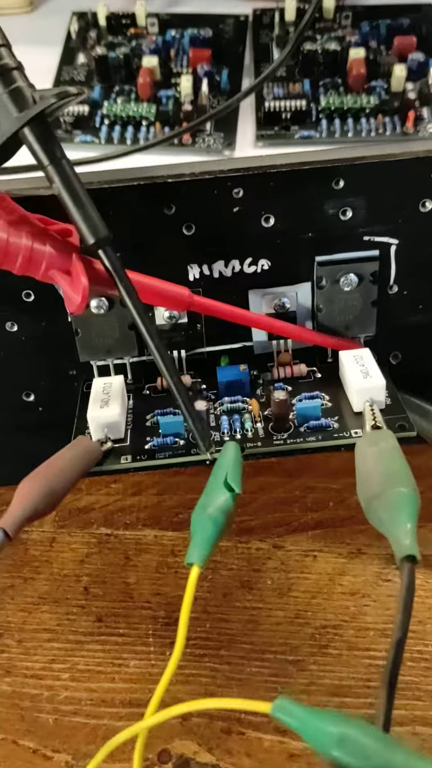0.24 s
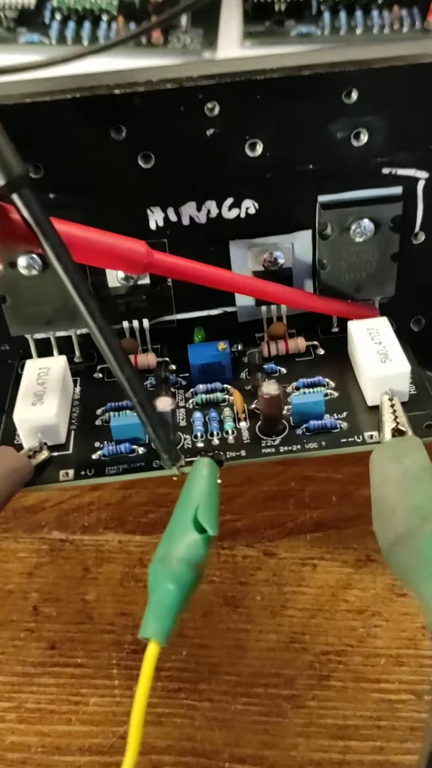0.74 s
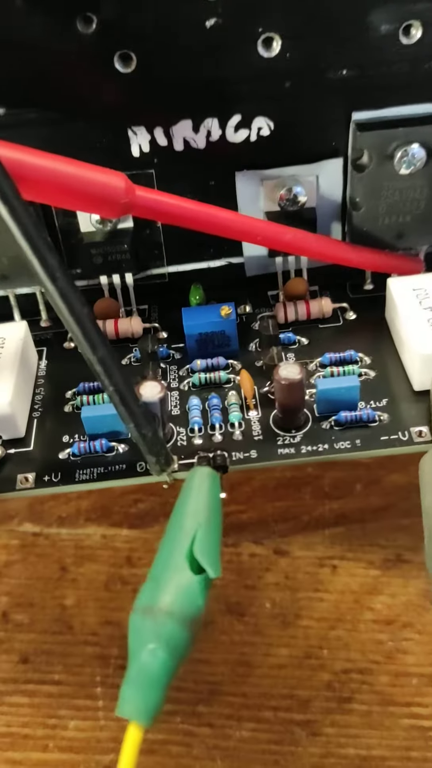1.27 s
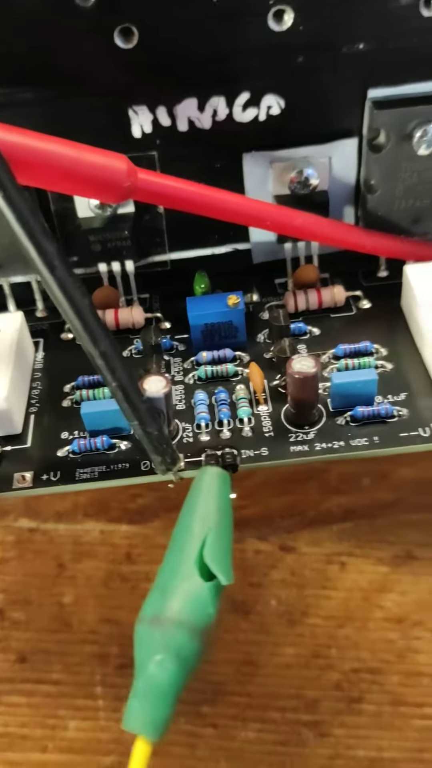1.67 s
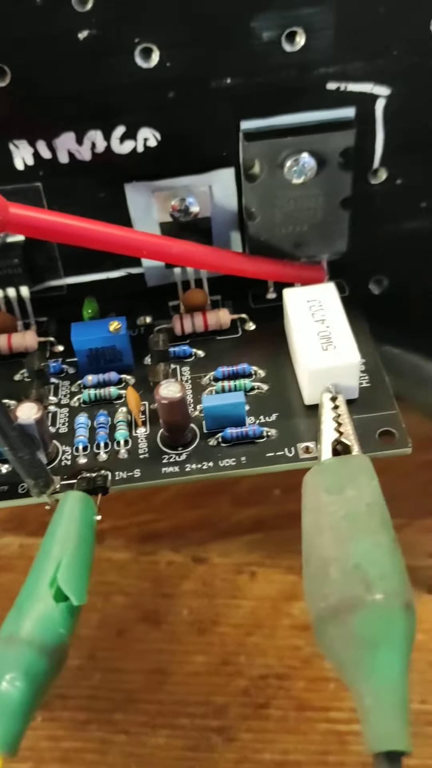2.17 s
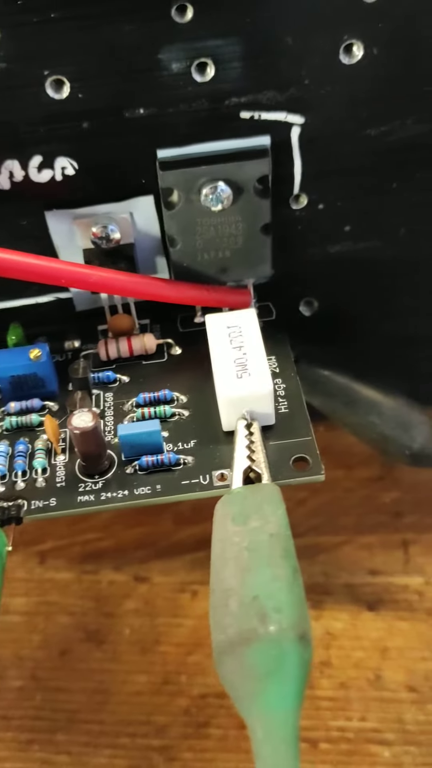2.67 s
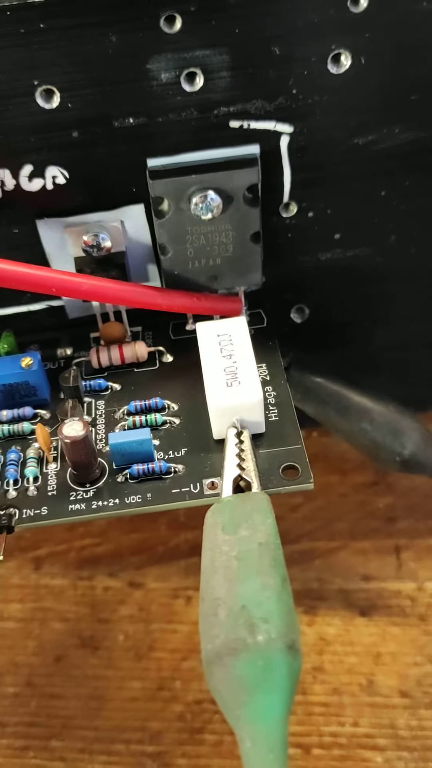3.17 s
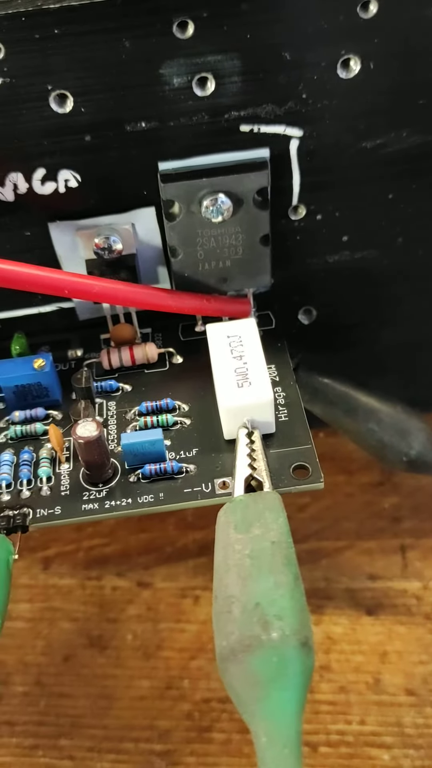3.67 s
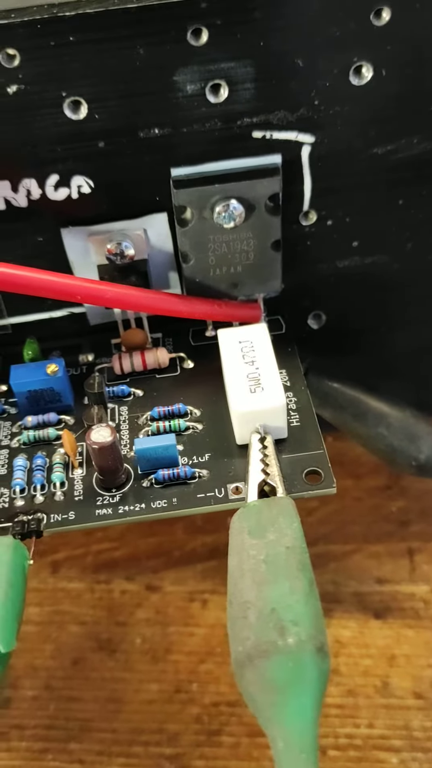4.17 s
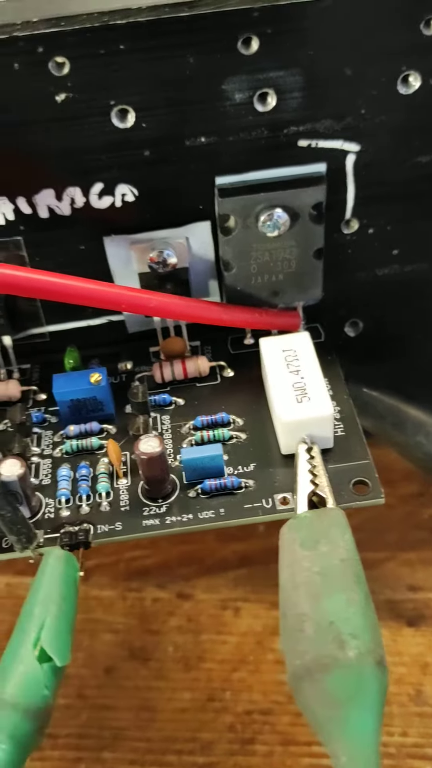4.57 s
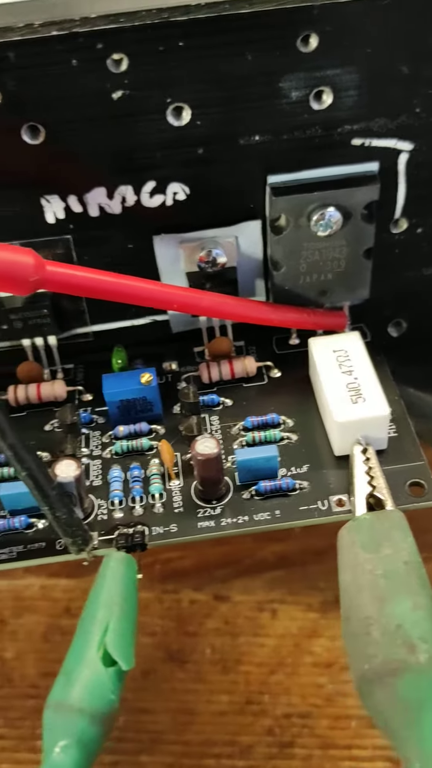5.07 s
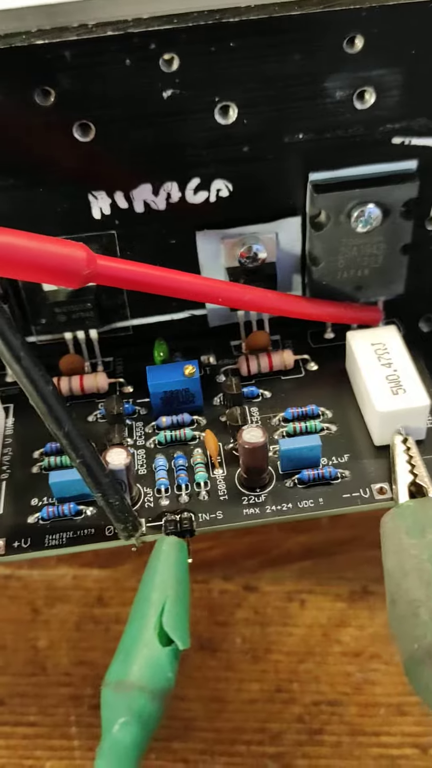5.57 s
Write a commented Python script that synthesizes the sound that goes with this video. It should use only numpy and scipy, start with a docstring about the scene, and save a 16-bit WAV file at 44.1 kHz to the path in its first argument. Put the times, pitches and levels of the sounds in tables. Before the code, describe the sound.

Beside an amplifier circuit board on a wooden bench, unseen equipment hums steadily. A low fan tone near 230 hertz wavers gently over soft rushing air, with faint transformer buzz and deep room rumble. A quick fade-in opens it, with high hiss strongest in the first half second, then settling. A phone's stereo microphones hear it slightly stronger on the left; a tiny skip occurs near 5.3 seconds.

```python
"""Powered equipment hums on a workbench, heard through a phone's two microphones. They wake up with a fade-in,
a fading offset and a hiss that settles. Throughout, a five-blade cooling fan sings its blade tone (wavering
sines) over rushing air (shaped noise), a mains transformer buzzes (sines), a second, slower fan adds unsteady
tones (narrow noise bands) and the room rumbles (noise). Near the end the phone drops one block of samples."""
import sys
import numpy as np
from scipy import signal
from scipy.fft import rfft, irfft, next_fast_len
from scipy.io import wavfile
from scipy.ndimage import uniform_filter1d, map_coordinates

SR = 44100
rng = np.random.default_rng(int(sys.argv[2]) if len(sys.argv) > 2 else 0)


def invert_db(level):
    """Linear amplitude ratio for a level in decibels (20 dB per decade), elementwise."""
    return 10 ** (np.asarray(level, dtype=float) / 20)


def digitize_waveform(pressure):
    """Quantize a signal to 16-bit integers and store it at the path in sys.argv[1].

    Rows of a 2-D input are taken as channels; values are limited to [-1, 1].
    """
    field = np.atleast_2d(pressure).T
    bounded = np.clip(field, -1, 1)
    quanta = np.round(bounded * 32767).astype(np.int16)
    wavfile.write(sys.argv[1], SR, quanta)


N = 256706  # samples heard
DROP_S, DROP_SAMPLES = 5.291, 1024  # where the lost block starts, and its length
LONG = N + DROP_SAMPLES  # samples made, before the block is lost
SHAFT_HZ, MAINS_HZ = 46.15, 49.99

# Fan tones as multiples of shaft speed; the third is the blade tone.
FAN_ORDERS = [1, 4, 5, 7.5, 10, 11, 15, 20, 25]
# Fan tones before swell and waver. Each row, one per order: left level in dB, right level in dB,
# radians by which left leads.
FAN_TONES = [(-75.5, -80, 1), (-74, -82, -1.5), (-51.5, -60, -0.54), (-74.5, -84.5, -1.5),
             (-66, -69, -0.46), (-81.5, -84, -3.5), (-91, -86.5, 1.5), (-74, -82.5, -2.5), (-75.5, -101, 0)]
# Slow swell of the blade tone. Each row: time in seconds, added level in dB.
BLADE_SWELL = [(.28, 2.5), (.6, -3.5), (.95, 0.5), (2.15, 4), (2.6, 1.5), (2.95, 5.5), (3.45, 1.5),
               (3.7, 4.5), (4, 1), (4.4, 3.5)]
# Rushing air before the room peaks. Each row: frequency in Hz, left level in dB per Hz, right level in dB per Hz.
AIR_SPECTRUM = [(93, -105.5, -101.9), (132, -93, -96.5), (202, -92, -98), (240.5, -80.5, -83),
                (329, -83, -95.5), (356, -90.5, -93), (448, -88, -93), (720, -94.5, -100.5),
                (784, -92.5, -99.5), (1026, -96, -101.7), (1570, -97.5, -105.8), (2230, -106.0, -108.4),
                (3600, -111.4, -114.7), (5330, -117.3, -117.4), (9100, -130, -130)]
# Stereo image of the air. Each row: frequency in Hz, left-right likeness (1 is identical, -1 opposite),
# radians by which left leads.
AIR_LIKENESS = [(59, 0.95, 0.5), (105, 0.67, 0), (166, 0.33, -0.05), (247, .9, -1), (334, 0.15, 0.8),
                (428, 1, 0), (538, 0.44, -.5), (840, 0.44, 0), (1040, 0.12, 1.5), (1200, 1, 1),
                (1550, 0.078, 2.5), (3020, 0.057, 3), (5900, 0.077, 2.5)]
# Standing waves that colour the air noise. Each row: centre in Hz, width in Hz, lift in dB (negative dips).
ROOM_PEAKS = [(172, 29, 7.5), (590, 39, 3), (771, 19, 7), (902, 69, 5), (990, 24, 2.5), (1051, 26, 6.5),
              (1200, 15, -5.5), (1360, 20, 4), (1467, 19, 7), (2870, 11, 10.5)]
# Transformer tones as multiples of mains frequency.
MAINS_ORDERS = [2, 6, 8, 10, 12, 14, 16]
# Transformer tones before waver. Each row, one per order: left level in dB, right level in dB,
# radians by which left leads.
TRANSFORMER_TONES = [(-75, -78.5, 0.16), (-64, -71, 1.16), (-80, -89.5, 2), (-71.5, -89, -1.47),
                     (-69.5, -71.5, -0.1), (-72, -76, -2.0), (-80.5, -81.5, 1)]
# Unsteady tones of the slower fan. Each row: frequency in Hz, random knots per second (sets the width),
# left gain in dB, right gain in dB.
SLOW_FAN_TONES = [(23.9, 2, -75, -78.5), (38.3, 6, -65.5, -70.5), (336, 2, -81.5, -87)]
# Room rumble. Each row: frequency in Hz, left level in dB per Hz, right level in dB per Hz.
RUMBLE_SPECTRUM = [(5, -89, -87.5), (16.5, -82.5, -88.5), (30.7, -95.5, -98.5), (40.3, -82, -86),
                   (52, -86, -89.5), (86.5, -99, -103), (144, -120, -120)]
# Microphone hiss before its settling gain. Each row: frequency in Hz, left level in dB per Hz,
# right level in dB per Hz.
HISS_SPECTRUM = [(940, -118, -118), (2540, -104.7, -104.7), (4000, -106.8, -106.5), (5430, -105.5, -106.2),
                 (6040, -103.7, -99.3), (7300, -102.2, -91.5), (7260, -93.5, -100.5), (8620, -93, -99.6),
                 (8990, -98, -105.8), (9360, -101.7, -109.5), (9900, -111.8, -112.5),
                 (11500, -111.2, -115.4), (13000, -115.3, -116.3), (15900, -114, -116)]
# Offset left by switching on, before the fade-in. Each row, left then right: size in dB, fall time in seconds.
SWITCH_ON_OFFSET = [(-35, 0.31), (-32, 0.23)]


def curve(rows, size):
    """(s, value) rows joined by straight lines."""
    return np.interp(np.arange(size) / SR, *np.transpose(rows))


def wobble(rate, channels=1):
    """Smooth random curves: splines through random knots, rate knots a second."""
    knots = rng.standard_normal((channels, int(LONG * rate / SR) + 4))
    position = np.arange(LONG) * rate / SR
    return np.array([map_coordinates(k, [position]) for k in knots])


def rush(spectrum, alike, patchy_db, peaks=()):
    """Stereo noise with a spectrum for each side, narrow peaks and patches of random gain."""
    cells = signal.stft(rng.standard_normal((2, LONG)), nperseg=512)[2]
    # both channels share one patch pattern, smoothed over frequency and then time
    patches = uniform_filter1d(rng.standard_normal(cells.shape[1:]), size=5, axis=0)
    patches = uniform_filter1d(patches, size=12, axis=1)
    patch_gain = invert_db(patchy_db * patches / patches.std())
    pair = signal.istft(cells * patch_gain, nperseg=512)[1][:, :LONG]

    size = next_fast_len(LONG)
    hz = np.fft.rfftfreq(size, 1 / SR)

    def along(points, values):
        return np.interp(np.log(hz + 1), np.log(points + 1), values)

    points, *sides = np.transpose(spectrum)
    lift_db = sum(db / (1 + (2 * (hz - centre) / width) ** 2) for centre, width, db in peaks)
    inside = (hz > points[0]) & (hz < points[-1])
    # sqrt(SR / 2) turns a level per Hz into a gain on white noise
    gain = [invert_db(along(points, db) + lift_db) * inside * np.sqrt(SR / 2) for db in sides]

    # sum and difference of two independent noises, weighted to give the wanted likeness
    points, likeness, lead = np.transpose(alike)
    angle = np.arccos(np.clip(along(points, likeness), -1, 1)) / 2
    common, opposed = rfft(pair, size) * [np.cos(angle), np.sin(angle)]
    left = (common + opposed) * np.exp(1j * along(points, lead))
    right = common - opposed
    return irfft(np.array([left, right]) * gain, size)[:, :LONG]


def tones(orders, table, base_hz, drift, waver_db, rate):
    """Multiples of one rotation; each wavers in level as the phone moves through the room's standing waves."""
    # drift scales a random wander of the rotation, in radians
    rotation = 2 * np.pi * base_hz * np.arange(LONG) / SR + drift * wobble(1.5)[0]
    out = np.zeros((2, LONG))
    for order, (left_db, right_db, lead) in zip(orders, table):
        level = invert_db([[left_db], [right_db]] + waver_db * wobble(rate))
        phase = order * rotation + rng.uniform(0, 2 * np.pi) + [[lead], [0]]
        out += np.sqrt(2) * level * np.sin(phase)  # levels are rms
    return out


def blade_tones():
    """Blades passing at five times shaft speed sing a firm tone, with weaker, less steady companions."""
    swell_db = curve(BLADE_SWELL, LONG) + 0.62 * wobble(3.194)
    blade = tones(FAN_ORDERS[2:3], FAN_TONES[2:3], SHAFT_HZ, drift=0.049, waver_db=0.69, rate=12.0)
    other_orders = FAN_ORDERS[:2] + FAN_ORDERS[3:]
    other_rows = FAN_TONES[:2] + FAN_TONES[3:]
    others = tones(other_orders, other_rows, SHAFT_HZ, drift=0.022, waver_db=2.0, rate=7)
    return invert_db(swell_db) * blade + others


def rushing_air():
    """Turbulent air as broadband noise, coloured by the room's standing waves and fluttering a little."""
    flutter = invert_db(0.6 * wobble(14))
    return flutter * rush(AIR_SPECTRUM, AIR_LIKENESS, patchy_db=0.6, peaks=ROOM_PEAKS)


def transformer():
    """A mains buzz: even multiples of the mains frequency, drifting together."""
    return tones(MAINS_ORDERS, TRANSFORMER_TONES, MAINS_HZ, drift=.04, waver_db=2.5, rate=2.92)


def slow_fan():
    """Narrow bands of noise: tones that lose their phase within a second."""
    t = np.arange(LONG) / SR
    out = np.zeros((2, LONG))
    for hz, knot_rate, left_db, right_db in SLOW_FAN_TONES:
        a, b = wobble(knot_rate, channels=2)
        tone = a * np.cos(2 * np.pi * hz * t) + b * np.sin(2 * np.pi * hz * t)
        out += invert_db([[left_db], [right_db]]) * tone
    return out


def room_rumble():
    """Low noise of the room, nearly alike in both ears of the phone."""
    return rush(RUMBLE_SPECTRUM, [(30, 0.94, 0.0017)], patchy_db=-0.5)


def microphone_hiss(t):
    """Noise that starts loud, drops around a knee, then creeps down to rest, nearly unrelated left to right."""
    rest_db, drop_db, knee_s, knee_sharpness = -18, 13, 0.47, 5.9
    creep_db, creep_s = 7.5, 1.14
    drop = drop_db / (1 + (t / knee_s) ** knee_sharpness)
    creep = creep_db * np.exp(-t / creep_s)
    return invert_db(rest_db + drop + creep) * rush(HISS_SPECTRUM, [(1000, 0.0067, 0.019)], patchy_db=1.4)


def switch_on_offset(t, opening):
    """A constant shift left by switching on, which rises with the opening input and decays exponentially."""
    return [invert_db(db) * opening * np.exp(-t / fall_s) for db, fall_s in SWITCH_ON_OFFSET]


def lose_block(x, t):
    """Skips one block of samples, with a very short crossfade across the join."""
    blend = np.clip((t[:N] - DROP_S) / .0008, 0, 1)  # 0.8 ms
    return x[:, :N] * (1 - blend) + x[:, DROP_SAMPLES:] * blend


def scene():
    """Everything on the bench and the room around it."""
    return blade_tones() + rushing_air() + transformer() + slow_fan() + room_rumble()


def band_limit(x):
    """A steep low-pass at the top of the band."""
    return signal.sosfilt(signal.butter(12, 15500, fs=SR, output="sos"), x)


def record(dry):
    """The phone adds hiss and offset, fades in along a straight ramp and loses one block."""
    fade_s, fade_from_db = 0.21, -11.5
    t = np.arange(LONG) / SR
    opening = np.minimum(t / fade_s, 1)
    fade_in = opening + invert_db(fade_from_db) * (1 - opening)
    mix = fade_in * (dry + microphone_hiss(t)) + switch_on_offset(t, opening)
    return band_limit(lose_block(mix, t))


dry = scene()
out = record(dry)
digitize_waveform(out)
```